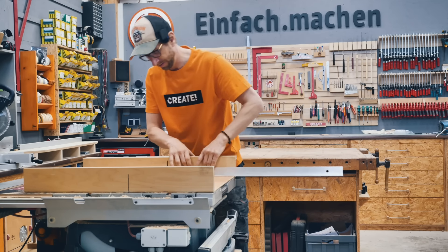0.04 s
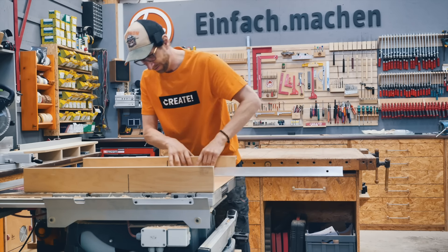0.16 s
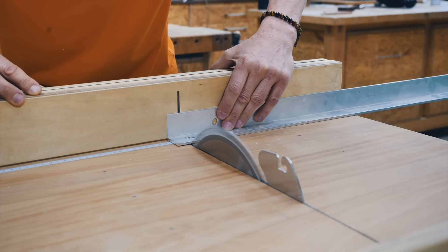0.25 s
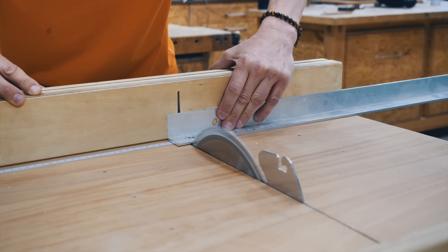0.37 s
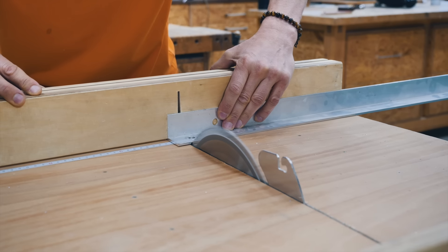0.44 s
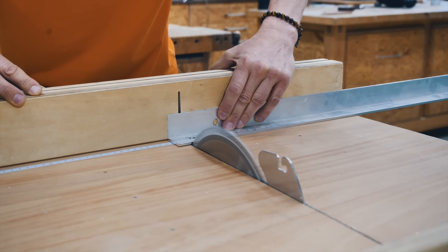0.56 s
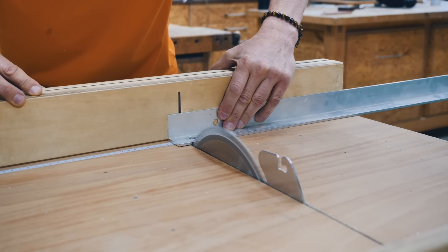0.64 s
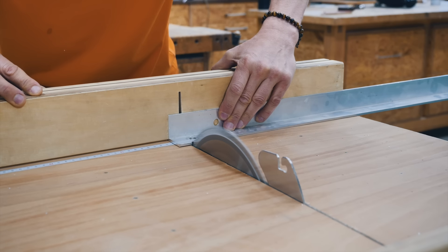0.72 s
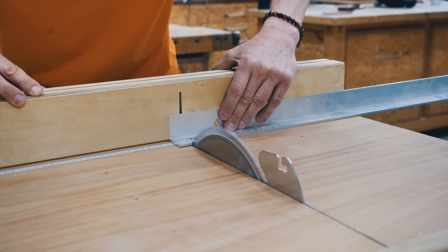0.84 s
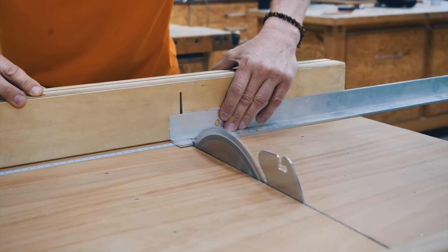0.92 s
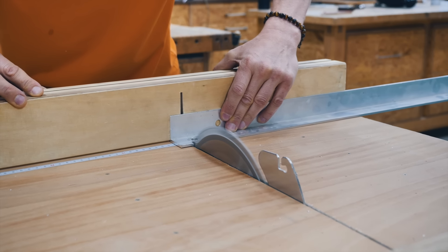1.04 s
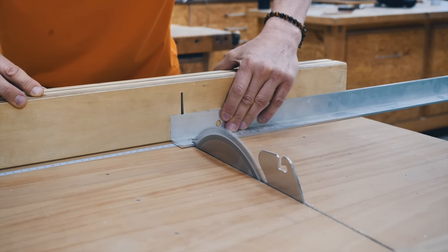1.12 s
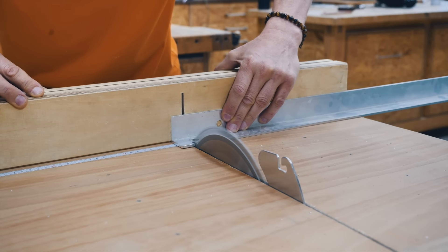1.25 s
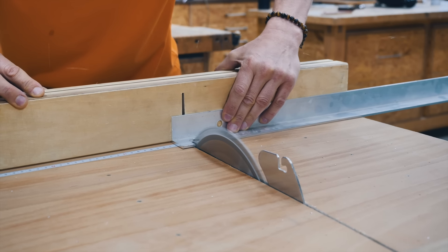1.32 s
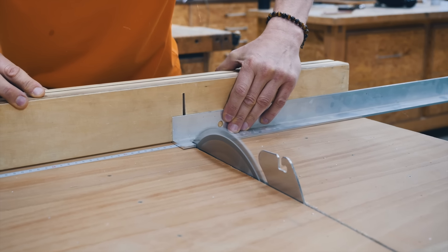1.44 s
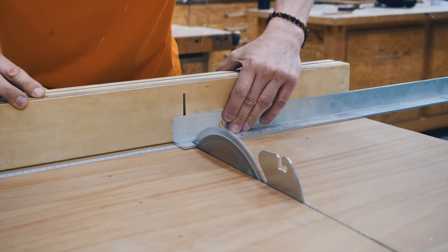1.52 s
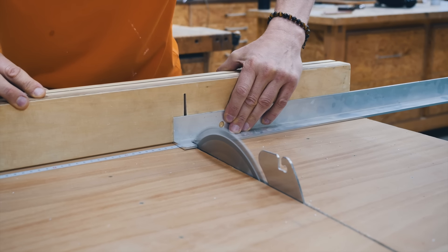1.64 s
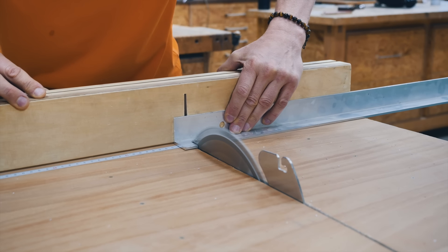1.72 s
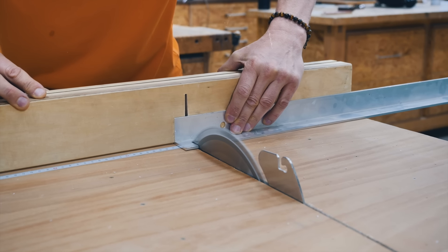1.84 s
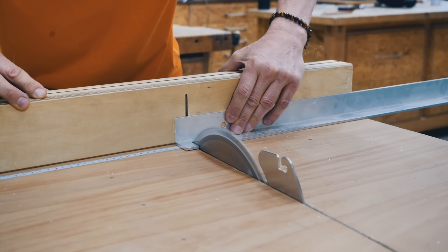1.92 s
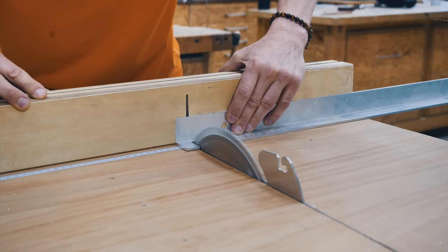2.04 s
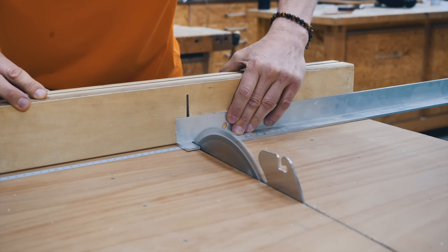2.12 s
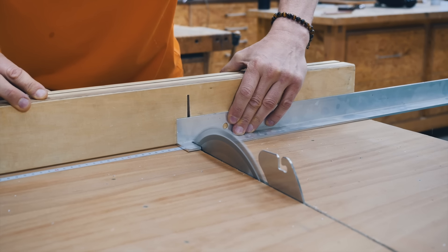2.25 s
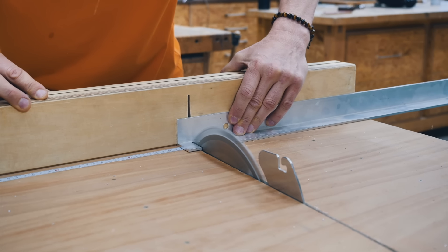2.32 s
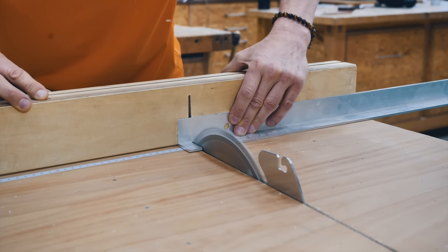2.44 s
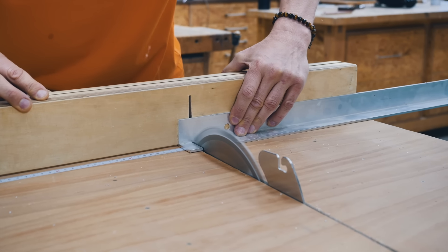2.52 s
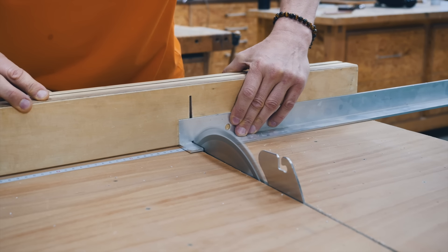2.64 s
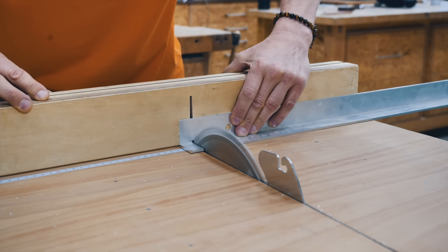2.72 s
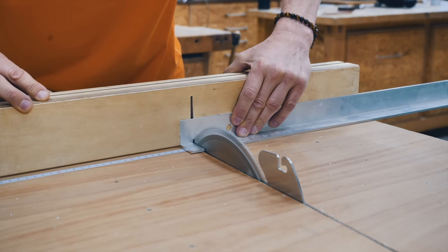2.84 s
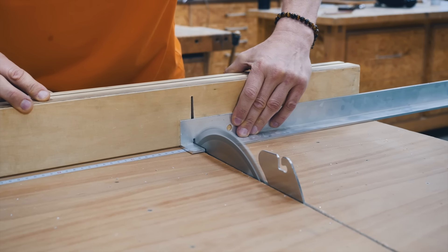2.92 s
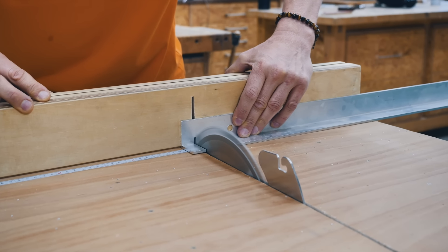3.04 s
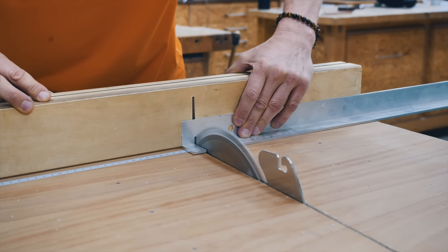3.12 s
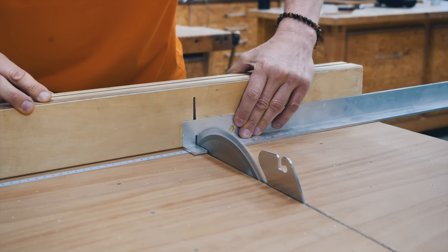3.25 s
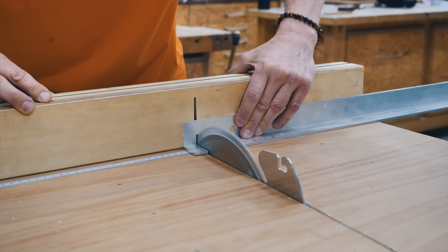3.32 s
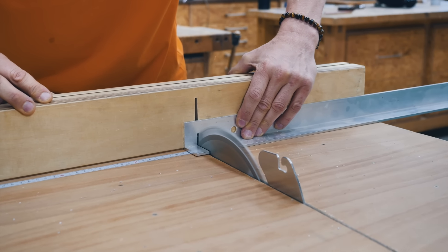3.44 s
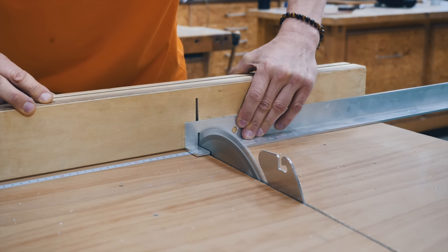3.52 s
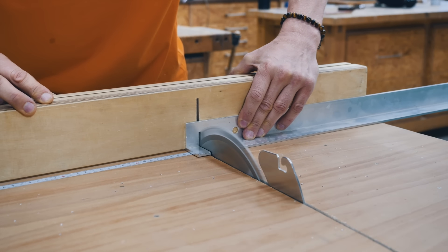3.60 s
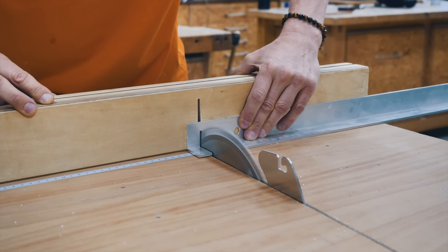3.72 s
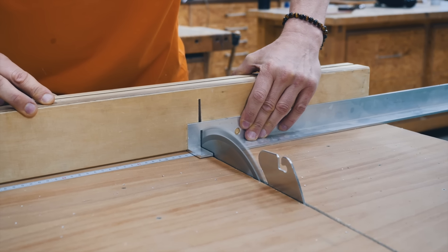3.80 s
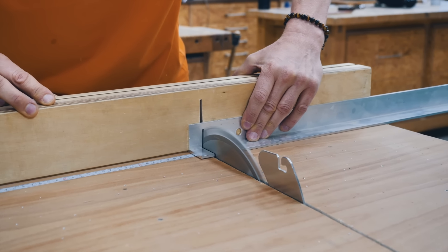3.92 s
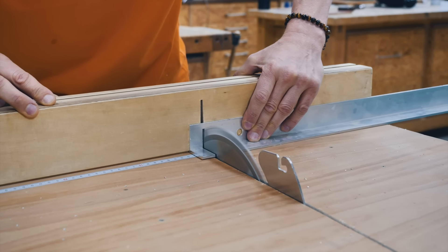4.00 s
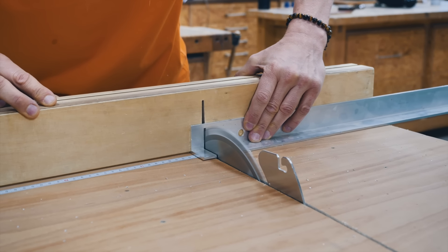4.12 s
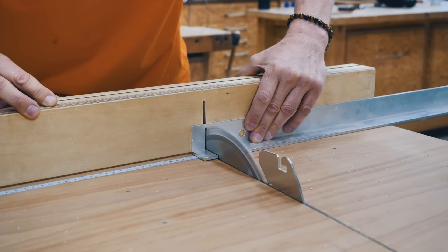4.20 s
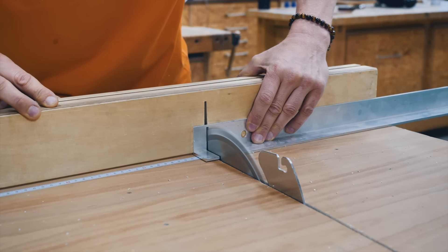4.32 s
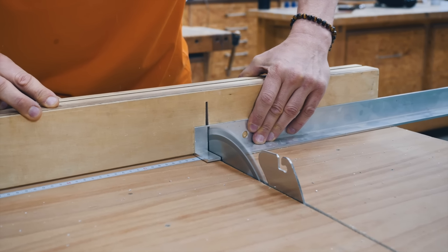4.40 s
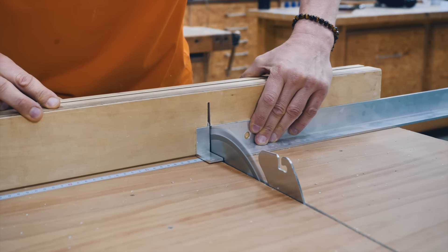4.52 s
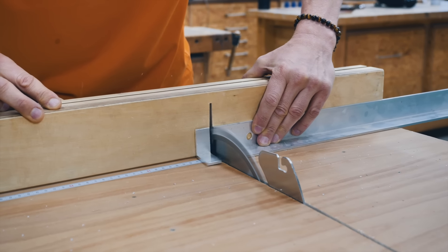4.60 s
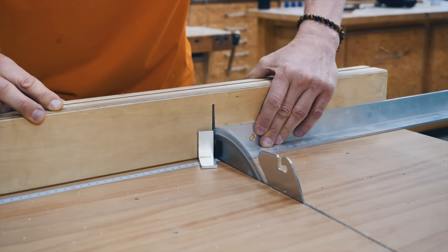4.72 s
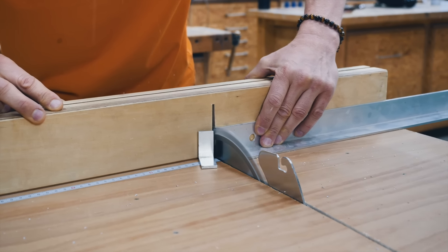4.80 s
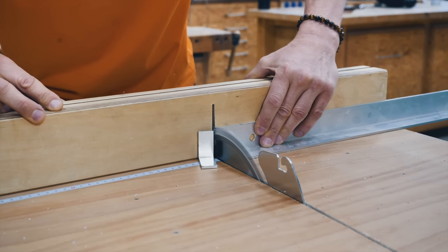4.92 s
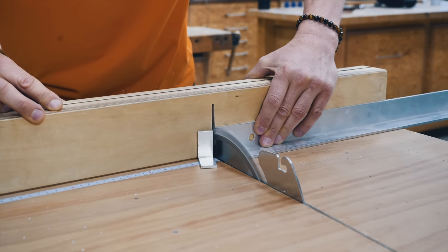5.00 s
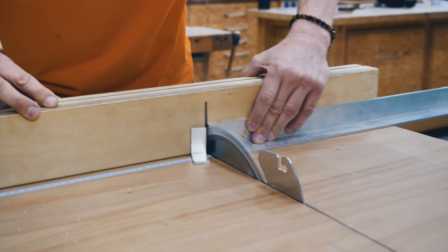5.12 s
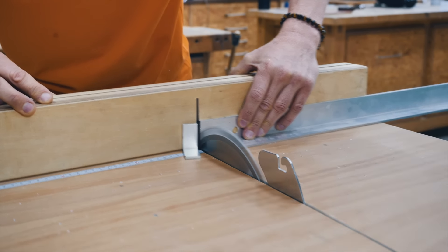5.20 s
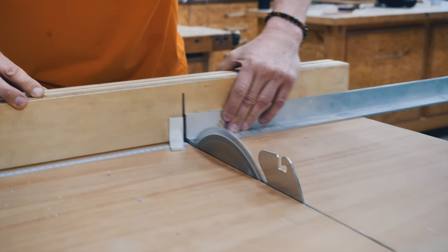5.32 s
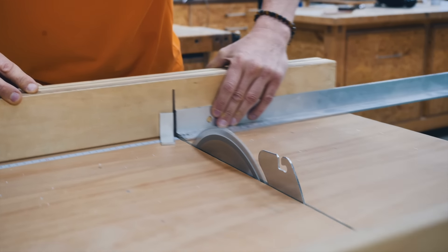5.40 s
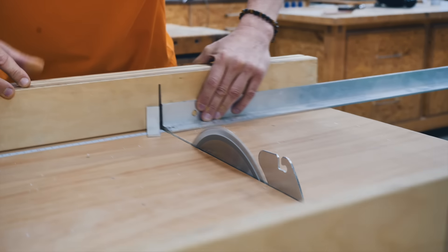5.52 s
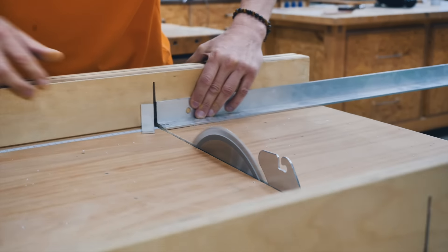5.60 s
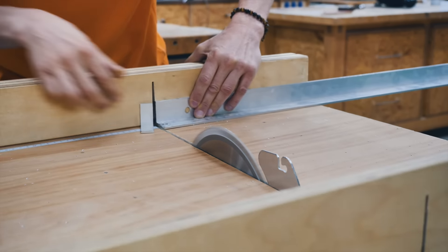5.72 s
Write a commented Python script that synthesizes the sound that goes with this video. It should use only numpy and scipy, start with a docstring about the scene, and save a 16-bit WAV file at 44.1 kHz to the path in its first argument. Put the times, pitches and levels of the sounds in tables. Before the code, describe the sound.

Very quiet handling of metal on wood is cut off by a loud close saw. Carbide teeth sing a steady buzzing whine through thin aluminium, throbbing quickly, with bright hiss, metallic ringing and sharp crackles. A screech builds toward the end, the tone stops suddenly, the offcut drops with bright tinkles, and the free blade hums with a beating ring, faint whistle and light brushing. Mono, close, modest workshop reverberation.

```python
"""An aluminium angle scrapes along the sled and taps the fence (shaped noise); the saw is off.
At 0.28 s this gives way at once to a running table saw cutting the angle: tooth-rate harmonics throb once
a turn, filtered noise makes hissing chips, narrow modes ring blade and angle, noise bursts are snags.
A screech precedes the break-through at 4.6 s; the offcut drops and tinkles as decaying sines and cracks.
The blade then runs free: ringing modes, hum, whirr, a faint tooth whistle and a few brushes."""
import sys
import numpy as np
from scipy import signal
from scipy.fft import rfft, irfft, next_fast_len
from scipy.io import wavfile
from scipy.ndimage import map_coordinates

SR = 44100
rng = np.random.default_rng(int(sys.argv[2]) if len(sys.argv) > 2 else 0)


def volts_from_db(level):
    """Convert decibel levels to linear amplitude ratios."""
    exponent = np.asarray(level, float) / 20
    return 10 ** exponent


def materialize(psi):
    """Save the field psi as 16-bit PCM at rate SR to the path in sys.argv[1].

    A 1-D psi becomes a single channel; in a 2-D psi each row is a channel.
    """
    bounded = np.clip(np.atleast_2d(psi).T, -1, 1)
    quanta = np.round(bounded * 32767).astype(np.int16)
    wavfile.write(sys.argv[1], SR, quanta)


N = 254016
T = np.arange(N) / SR
CUT_S, THROUGH_S = 0.2808, 4.605  # running saw is heard from; blade breaks through

# progress of the cut, 0 beginning, 1 deep, 2 ending: time_s, stage
STAGE = [(.55, 0), (1.1, 1), (3.3, 1), (3.8, 2)]
# blade modes that sing: pitch_hz, usual_level_while_cutting_db, free_t60_s
SINGERS = [(1305, -47, 4), (1497, -44, 3), (2422, -41, 5.5)]


def unit(x):
    """Scales to rms 1."""
    return x / np.sqrt(np.mean(x ** 2) + 1e-20)


def along(points, hz):
    """Interpolates (Hz, value) points on a log frequency axis."""
    point_hz, value = np.transpose(points)
    return np.interp(np.log(hz + 1), np.log(point_hz + 1), value)


def curves(rows):
    """One value per sample for each column after the time."""
    time_s, *columns = np.transpose(rows)
    return [np.interp(T, time_s, column) for column in columns]


def wobble(rate_hz):
    """A smooth random curve with rate_hz knots a second."""
    knots = rng.standard_normal(int(N * rate_hz / SR) + 4)
    return map_coordinates(knots, [T * rate_hz])


def filtered(x, response):
    """Multiplies the spectrum of x by a response of frequency."""
    size = next_fast_len(N + 8192)
    return irfft(rfft(x, size) * response(np.fft.rfftfreq(size, 1 / SR)), size)[:N]


def noise(spectrum):
    """Noise of rms 1 with the given colour."""
    return unit(filtered(rng.standard_normal(N), lambda hz: volts_from_db(along(spectrum, hz))))


def tone(hz, blur_hz):
    """A sine of rms 1 whose pitch shivers."""
    cycles = np.cumsum(hz + blur_hz * wobble(60)) / SR
    return np.sqrt(2) * np.sin(2 * np.pi * cycles + rng.uniform(0, 2 * np.pi))


def fade(start_s, t60_s):
    """1 before start_s, then an exponential decay."""
    return volts_from_db(-60 * np.clip(T - start_s, 0, None) / t60_s)


def bursts(events, rise_s):
    """A level that climbs at each (start_s, level_db, decay_s) event and dies away exponentially."""
    level = np.zeros(N)
    for start_s, level_db, decay_s in events:
        after_s = np.clip(T - start_s, 0, None)
        level += volts_from_db(level_db) * (1 - np.exp(-after_s / rise_s)) * np.exp(-after_s / decay_s)
    return level


def tooth_lift(turns):
    """The blade runs out of true: near 1 while the teeth lift off the metal, for part of each turn."""
    # share of each turn with teeth in the metal: time_s, share_0_to_1
    share_rows = [(.3, .36), (.55, .4), (.9, .57), (1.3, .68), (2.5, .64), (4.6, .63)]
    share, = curves(share_rows)
    height = -np.cos(2 * np.pi * turns) + 0.039 * wobble(90)
    return 1 / (1 + np.exp(-5 * (height + np.cos(np.pi * np.clip(share, 0, 1)))))


def teeth():
    """Tooth passes make harmonics, uneven teeth make shaft orders; also returns the tooth contact."""
    # tooth rate: time_s, rate_hz
    speed = [(.33, 1934), (.5, 1929), (.6, 1915), (.74, 1882), (.88, 1856), (1.1, 1831), (1.24, 1831),
             (1.55, 1851), (1.88, 1847), (2.05, 1858.5), (2.18, 1858), (2.41, 1847), (2.95, 1856.5),
             (3.07, 1852.5), (3.3, 1828.5), (3.65, 1826), (3.9, 1832), (4.2, 1857), (4.37, 1858.5),
             (4.49, 1867)]
    # strength of the bite: time_s, whine_db, second_harmonic_db, upper_harmonics_db
    bite = [(.3, -20, -33.5, -32.5), (.52, -20.5, -24, -26), (.74, -24, -30.5, -43),
            (1.15, -21, -28.5, -36), (1.6, -20.5, -37, -37), (2.1, -21.5, -24.5, -27.5),
            (2.5, -17.5, -30, -42), (2.7, -15.5, -33, -35), (3.08, -14.5, -22, -31), (3.3, -12, -34.5, -28),
            (3.6, -13, -23, -25), (3.85, -16.5, -28, -26.5), (4.08, -20.5, -26.5, -38),
            (4.33, -16.5, -12, -22.5), (4.55, -15, -14, -23.5), (4.6, -23, -21, -19)]
    # throb: time_s, depth_0_to_1
    runout_rows = [(.45, .5), (.62, .95), (.8, .95), (.97, .5), (1.15, .96)]
    # 3rd to 8th harmonic relative to the upper level: level_db
    upper_offsets_db = [1.5, -1, -2.5, -9.5, -17, -12]
    # uneven and alternately bevelled teeth: multiple_of_shaft_rate, level_db
    uneven_orders = [(15, -5), (17, -7), (18, -10), (19, -3), (20, 2), (21, -9), (23, -4), (24, -8),
                     (27, -12), (32, -5), (33, -4), (35, -8), (45, -8), (46, -11), (47, -5), (60, -3),
                     (100, 4), (140, -6)]
    # strength of the uneven bite: time_s, level_db
    growl_rows = [(.29, -41), (.7, -38), (.95, -35), (2.73, -36), (2.9, -49), (3.5, -59), (3.6, -53),
                  (4.27, -51), (4.6, -33.5)]
    tooth_count = 40
    deep_softens_db = 11  # 4th and higher harmonics, once the teeth are deep in the metal

    rate_hz, = curves(speed)
    whine_db, second_db, upper_db = curves(bite)
    throb = np.clip(curves(runout_rows)[0] + 0.05 * wobble(6), 0, 1)
    passes = np.cumsum(rate_hz + 3 * wobble(150)) / SR
    turns = passes / tooth_count
    lift = tooth_lift(turns)
    deep = np.clip(curves(STAGE)[0], 0, 1)

    levels_db = [whine_db, second_db + 1.3 * wobble(6.5)]
    for k, offset_db in enumerate(upper_offsets_db):
        levels_db.append(upper_db + offset_db - deep_softens_db * deep * (k > 0) + 0.98 * wobble(7))

    flutter_db = wobble(40)  # a firmer bite lifts all harmonics together
    whine = np.zeros(N)
    for k, level_db in enumerate(levels_db):
        waver_db = np.sqrt(k + 1) * (0.55 * flutter_db + 0.37 * wobble(40))
        # harmonics above the first need a tooth in the metal
        gate = unit(1 - throb * lift if k == 0 else 1 - lift)
        whine += volts_from_db(level_db + 3.0 + waver_db) * np.sin(2 * np.pi * (k + 1) * passes + k) * gate

    uneven = np.zeros(N)
    for order, level_db in uneven_orders:
        waver_db = 1.5 * wobble(5) + 3 * wobble(40)
        uneven += volts_from_db(level_db + waver_db) * np.sin(2 * np.pi * (order * turns + rng.random()))
    growl_db, = curves(growl_rows)
    return (whine + volts_from_db(growl_db) * uneven) * fade(THROUGH_S, 0.028), 1 - lift


def chips(touch):
    """Chips tear off as noise and shake the angle, whose resonances shift as the cut deepens."""
    # chip hiss: time_s, hiss_db, treble_over_hiss_db
    feed = [(.29, -20, 10), (.5, -21.5, 4.5), (1.2, -20, 3), (1.62, -21, 9.5), (1.85, -20.5, 8.5),
            (2.18, -18.5, 4), (2.26, -19.5, -0.5), (2.65, -19, 2.5), (2.95, -19.5, 1), (3.3, -21, 6.5),
            (3.55, -22.5, 6.5), (3.95, -17.5, 7), (4.39, -16, 6), (4.59, -19, 6), (4.64, -21.5, 10),
            (4.75, -16.5, -18)]
    # colour of the tearing: frequency_hz, level_db_per_hz
    hiss_spectrum = [(400, -28.5), (700, -18), (2000, -4), (4000, -10), (6000, -12.5), (9000, -18.5),
                     (12000, -25.5), (15600, -32)]
    # one set of angle resonances per stage: centre_hz, width_hz, level_db
    angle_sets = [
        [(1020, 810, 4.5), (2360, 880, 0), (3230, 130, 3), (3820, 210, -7), (5960, 300, -1), (7340, 510, 3),
         (9550, 700, -0.5), (11200, 300, -3), (15400, 300, -2)],
        [(1040, 250, 0.5), (2460, 180, 1), (3280, 100, -1.5), (3650, 340, 0), (4654, 61, 3), (5370, 230, 6),
         (6770, 200, 1.5), (9130, 430, -1.5), (10650, 580, 1.5), (13100, 600, -12)],
        [(1160, 200, -5.5), (2400, 610, -10.5), (3770, 160, -5), (4700, 130, 0), (5420, 360, 3.5),
         (7240, 200, -2), (9060, 110, 1), (10300, 300, -1.5), (11300, 300, -10)],
    ]
    # table rumble: time_s, level_db
    table_rows = [(.29, -31.5), (.62, -34.5), (3.69, -39.5), (4.59, -37), (4.63, -40.5)]
    # colour of the rumble: frequency_hz, level_db_per_hz
    rumble_spectrum = [(15, -51), (25, -63), (107, -33), (156, 1), (288, -11.5), (452, -3), (647, -7.5),
                       (677, -43), (730, -2), (900, -19), (1170, -5), (1980, -120)]

    def body(peaks):
        def response(hz):
            power = 0.26
            for centre_hz, width_hz, level_db in peaks:
                power = power + volts_from_db(2 * level_db) / (1 + (2 * (hz - centre_hz) / width_hz) ** 2)
            return np.sqrt(power)
        return response

    hiss_db, treble_db = curves(feed)
    stage, = curves(STAGE)
    tear = noise(hiss_spectrum) * volts_from_db(0.86 * wobble(400) + 1.1 * wobble(25.07))
    tear = tear * (1.3 + touch)  # strongest while teeth are in the metal
    ring = np.zeros(N)
    for k, peaks in enumerate(angle_sets):
        weight = np.sqrt(np.clip(1 - abs(stage - k), 0, 1))
        ring += weight * unit(filtered(tear, body(peaks)))
    treble = filtered(ring, lambda hz: 1 / (1 + (7500 / (hz + 1)) ** 8))
    hiss = volts_from_db(hiss_db) * (ring - treble + volts_from_db(treble_db + wobble(5.5)) * treble)
    rumble = volts_from_db(curves(table_rows)[0]) * noise(rumble_spectrum)
    return (hiss + rumble) * fade(4.66, 0.4)


def screech(touch):
    """The last web of metal chatters: a rough squeal, stronger while the teeth are in the metal each turn."""
    # squeal: time_s, pitch_hz, level_db
    squeal = [(3.55, 3230, -33), (3.68, 3320, -32), (3.78, 3280, -20.5), (4.08, 3280, -20),
              (4.18, 3304, -19), (4.604, 3192, -21)]
    hz, level_db = curves(squeal)
    rough = sum(wobble(rate_hz) * tone(hz, blur_hz=30.37) for rate_hz in (250, 400))
    rough = unit(rough * (1.3 + touch))
    return volts_from_db(level_db + 1.3 * wobble(13)) * rough * (T > squeal[0][0]) * fade(THROUGH_S, 0.08)


def thin_modes():
    """Narrow two-pole resonators driven by the cut's noise ring on briefly after it."""
    # mode frequencies: pitch_hz
    modes_hz = [2724, 2818, 3184, 3860, 4008, 4081, 4156, 4253, 4395, 4554, 4590, 4730, 4893, 5246, 5472,
                6242, 6700, 6900, 7115, 8055, 8204, 8750, 9250, 10170, 13200]
    # one row per mode: level_begin_db, level_deep_db, level_end_db
    modes_db = [(-45, -42, -33), (-56, -36.5, -34.5), (-34, -34.5, -32), (-38, -30.5, -31), (-40, -44, -45),
                (-50, -45, -31), (-35.5, -44, -47), (-52, -43, -41), (-43, -37.5, -49), (-54, -36, -29.5),
                (-48, -30, -38), (-34, -31.5, -34), (-54, -61, -33), (-33, -35, -38), (-39, -36.5, -30),
                (-36, -38.5, -36), (-36, -69, -37), (-52, -43, -38), (-36, -38, -51), (-43, -40, -46),
                (-46, -39, -37), (-53, -39, -48), (-58, -42, -55), (-59, -47, -58), (-60, -51, -60)]
    stage, = curves(STAGE)
    out = np.zeros(N)
    for hz, levels_db in zip(modes_hz, modes_db):
        t60_s = 0.55 * np.sqrt(4000 / hz)  # higher modes die sooner
        pole = volts_from_db(-60 / (t60_s * SR))
        drive = rng.standard_normal(N) * volts_from_db(1.35 * wobble(2.46)) * (T < THROUGH_S)
        ring = signal.lfilter([1], [1, -2 * pole * np.cos(2 * np.pi * hz / SR), pole ** 2], drive)
        out += volts_from_db(np.interp(stage, np.arange(len(levels_db)), levels_db)) * unit(ring)
    return out


def singing_levels():
    """Each singing mode wavers in a murmur while cutting, with swells that ring out."""
    # a mode is set singing: start_s, singer_index, peak_db, held_s
    swells = [(.49, 0, -32.5, 0.017), (.71, 2, -31, 0.22), (1.35, 0, -27, 0.046), (1.8, 1, -31, 0.039),
              (1.89, 0, -34, 0.045), (2.1, 2, -23, .1), (3.3, 0, -33.5, .4), (3.3, 1, -36.5, 0.71),
              (4.03, 0, -32.5, 0.026), (4.02, 2, -28, 0.12), (4.46, 2, -25, 0.029), (4.57, 0, -28, 0.11),
              (4.66, 2, -30.5, 0.13)]
    rise_s, damping = 0.15, 3.2  # damping: how much faster a mode dies while the metal grips the blade
    stopped_s, stop_t60_s = 5.335, 0.5  # brushing the cut end stills the blade

    levels = [volts_from_db(level_db + 4.5 * wobble(3)) * fade(THROUGH_S, t60_s / damping)
              for _, level_db, t60_s in SINGERS]
    decay_clock_s = np.cumsum(np.where(T < THROUGH_S, damping, 1)) / SR  # runs faster while gripped
    for start_s, k, peak_db, held_s in swells:
        after_s = np.clip(decay_clock_s - np.interp(start_s + held_s, T, decay_clock_s), 0, None)
        rise = np.exp(np.clip(T - start_s, None, 0) / rise_s)
        levels[k] = np.hypot(levels[k], volts_from_db(peak_db - 60 * after_s / SINGERS[k][2]) * rise)
    return [level * fade(stopped_s, stop_t60_s) for level in levels]


def singers():
    """Lightly damped blade modes as shivering sines; the last is split and beats."""
    voices = [level * volts_from_db(0.7 * wobble(15)) * tone(mode[0], blur_hz=2)
              for mode, level in zip(SINGERS, singing_levels())]
    voices[-1] = voices[-1] * np.sqrt(2) * np.cos(np.pi * 6.4 * (T - 4.81))  # 6.4 beats a second
    return sum(voices)


def release():
    """The freed blade rings out as decaying sines."""
    # freed modes: pitch_hz, level_db, t60_s
    freed_modes = [(3187, -41, 1.5), (3865, -39, 1.1), (4016, -35, 1.1), (4247, -33, .42), (4597, -33, .5),
                   (4743, -35, 1.2), (5060, -41, 1.2)]
    return sum(volts_from_db(level_db) * tone(hz, blur_hz=3.9) * (T > THROUGH_S - 0.03) * fade(THROUGH_S, t60_s)
               for hz, level_db, t60_s in freed_modes)


def tongue():
    """The half-cut end of the angle sings as one blurred sine until the break-through."""
    # half-cut end: time_s, pitch_hz, level_db
    end_rows = [(1.2, 7100, -31), (2.9, 7110, -43.5), (3.5, 7270, -32), (4.2, 7270, -44), (4.6, 7490, -27)]
    hz, level_db = curves(end_rows)
    ring = volts_from_db(level_db + 3 * wobble(50)) * tone(hz, blur_hz=25)
    return ring * (T > end_rows[0][0]) * fade(THROUGH_S, 0.03)


def air_modes():
    """Modes that the air alone keeps alive swell and sink, building as the blade regains speed."""
    # air-fed modes: pitch_hz, level_db, swell_db, swell_period_s, a_swell_at_s
    air_rows = [(6220, -40, 4, 0.32, 5.24), (8597, -50, 3, .4, 5.12), (12495, -66, 3, .31, 5.24)]
    build = np.clip((T - THROUGH_S) / 0.7, 0, 1)
    out = np.zeros(N)
    for hz, level_db, swell_db, period_s, crest_s in air_rows:
        swing_db = swell_db * np.cos(2 * np.pi * (T - crest_s) / period_s)
        out += volts_from_db(level_db + swing_db + 1.7 * wobble(12)) * tone(hz, blur_hz=2.9) * build
    return out


def snags():
    """Chips and burrs snag, and the cut end brushes the blade: scratchy noise bursts, sharp at the start."""
    # snags by the teeth: start_s, level_db
    snag_rows = [(.748, -19), (1.254, -14), (1.324, -16), (1.387, -26), (1.507, -17), (1.735, -16),
                 (1.811, -10.5), (1.869, -17), (1.972, -21), (2.166, -14), (2.203, -20), (3.552, -17)]
    # brushes as the sled draws back: start_s, level_db
    brush_rows = [(5.243, -33), (5.316, -29), (5.33, -36), (5.398, -26.5), (5.418, -35)]
    # colour of the scratch: frequency_hz, level_db
    scratch_spectrum = [(1500, -65), (4000, 10), (8000, 5), (12000, -4), (15600, -28.5)]
    snag_decay_s, brush_decay_s = 0.015, 0.016
    events = [(start_s, level_db, snag_decay_s) for start_s, level_db in snag_rows]
    events += [(start_s, level_db, brush_decay_s) for start_s, level_db in brush_rows]
    return bursts(events, rise_s=0.0007) * noise(scratch_spectrum) * volts_from_db(2.2 * wobble(300))


def offcut():
    """Each bounce cracks (noise) and rings the small piece (decaying sines) at new strengths."""
    # modes of the piece: pitch_hz, level_db, t60_s
    piece_modes = [(7574, 0, .33), (9060, -6, .3), (10250, -9, .2), (15240, -16, .22)]
    # bounces: start_s, ring_db, crack_db, extra_on_edge_mode_db
    drops = [(4.602, -38, -34, 28), (4.622, -28, -32, 4), (4.639, -16, -15, 0), (4.686, -29, -27, 0),
             (4.717, -36, -33, 3)]
    edge_mode = 2
    out, t = np.zeros(N + SR), np.arange(SR // 2) / SR
    for start_s, ring_db, crack_db, edge_db in drops:
        ring = np.zeros(len(t))
        for k, (hz, level_db, t60_s) in enumerate(piece_modes):
            strength_db = level_db + edge_db * (k == edge_mode) + rng.normal(0, 3.0)
            ring += volts_from_db(strength_db - 60 * t / t60_s) * np.sin(2 * np.pi * hz * t)
        crack = volts_from_db(-60 * t / 0.021) * rng.standard_normal(len(t))
        out[round(start_s * SR):][:len(t)] += volts_from_db(ring_db) * ring + volts_from_db(crack_db) * crack
    return out[:N] * volts_from_db(2 * wobble(70) - 1)  # it rocks on the table as it rings


def motor():
    """Motor hum, belt and air noise; the teeth whistle faintly once they are clear of the metal."""
    # hum: time_s, pitch_hz, level_db
    hum_rows = [(.29, 694, -30.5), (.6, 694, -38.5), (1.2, 694, -47), (3, 694, -44.5), (4.5, 694, -42),
                (5, 694, -38), (5.76, 694, -34.5)]
    # motor and air: time_s, level_db
    free_rows = [(4.6, -31), (4.734, -29), (4.96, -29), (5.76, -26.5)]
    # colour of motor and air: frequency_hz, level_db_per_hz
    whirr_spectrum = [(18, -82), (30, -47), (187, -10.5), (324, -13), (389, -6), (607, -8.5), (692, -8.5),
                      (831, -7), (1770, -5), (1970, -1.5), (4320, -16.5), (6390, -18.5), (6910, -19.5),
                      (15600, -46.5)]
    # teeth in free air: time_s, pitch_hz, level_db
    whistle_rows = [(4.75, 1875, -37), (5.11, 1938, -47), (5.39, 1938, -44), (5.43, 1950, -33),
                    (5.76, 1932, -31.5)]

    hum_hz, hum_db = curves(hum_rows)
    hum = volts_from_db(hum_db + wobble(25)) * tone(hum_hz, blur_hz=1.34)
    whirr_db, = curves(free_rows)
    whirr = volts_from_db(whirr_db + 0.23 * wobble(11)) * noise(whirr_spectrum)
    whistle_hz, whistle_db = curves(whistle_rows)
    whistle = volts_from_db(whistle_db + wobble(21.75)) * tone(whistle_hz, blur_hz=4.95)
    clear = np.clip((T - 4.6) / 0.15, 0, 1)
    return hum + clear * (whirr + whistle)


def slide():
    """The angle scrapes along the sled and taps the fence; the sled thumps and shudders: all noise."""
    # sliding: time_s, scrape_db, sled_db
    slide_rows = [(0.0, -52, -41), (0.038, -38, -52), (0.058, -54, -34), (0.096, -56, -39),
                  (0.268, -64.5, -60), (0.28, -63, -55)]
    # colour of the scrape: frequency_hz, level_db_per_hz
    scrape_spectrum = [(530, -20.5), (900, -6), (1680, -4), (2310, -7), (2510, -4), (3210, -11),
                       (5920, -15), (15000, -39)]
    # colour of the sled: frequency_hz, level_db_per_hz
    sled_spectrum = [(29, -51), (50, -29), (139, -1), (182, -8), (285, -13), (330, -13), (388, -19),
                     (1200, -25), (1560, -65), (2640, -120)]
    # the angle meets the fence: start_s, level_db, decay_s
    tap_rows = [(.046, -35.5, 0.037), (.239, -45, .015)]
    scrape_db, sled_db = curves(slide_rows)
    scrape = volts_from_db(scrape_db) * noise(scrape_spectrum)
    sled = volts_from_db(sled_db + 2.4 * wobble(71)) * noise(sled_spectrum)
    tap_colour = noise([(80, -17), (200, 0), (1000, -7), (3000, -19), (8000, -53)])  # Hz, dB
    return scrape + sled + bursts(tap_rows, rise_s=0.0007) * tap_colour


def shop(x):
    """The room answers with a noise tail in which each frequency dies at its own speed."""
    # room decay: frequency_hz, t60_s
    decay = [(200, 0.66), (2000, 0.52), (10000, 0.14)]
    hz, t, spectra = signal.stft(rng.standard_normal(SR // 2), SR, nperseg=256)
    spectra = spectra * volts_from_db(-60 * t / along(decay, hz)[:, None])
    tail = signal.istft(spectra, SR, nperseg=256)[1]
    delayed = np.pad(x, (300, 0))  # samples
    return signal.fftconvolve(delayed, tail / np.linalg.norm(tail))[:N]


def scene():
    """The quiet slide, then the saw."""
    whine, touch = teeth()
    near = whine + snags() + offcut()
    blade = thin_modes() + singers() + release() + tongue() + air_modes()
    room_db = -18
    saw = near + volts_from_db(room_db) * shop(near) + chips(touch) + screech(touch) + blade + motor()
    running = np.clip((T - CUT_S) / 0.00063, 0, 1)
    return (running * saw + (1 - running) * slide())[None]


def band_limit(x):
    """A steep low-pass at the top of the band."""
    return signal.sosfilt(signal.butter(12, 15700, fs=SR, output="sos"), x)


def record(dry):
    """The recorder rounds off the loudest peaks and drops the deepest bass."""
    rounded = dry / (1 + abs(dry / 0.5) ** 6) ** (1 / 6)
    mix = filtered(rounded[0], lambda hz: 1 / (1 + (60 / (hz + 1)) ** 4))[None]
    return band_limit(mix)


dry = scene()
out = record(dry)
materialize(out)
```